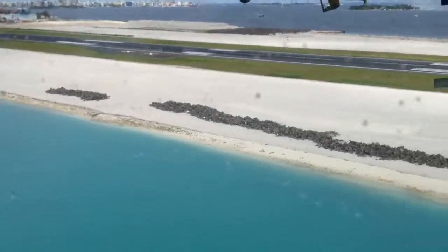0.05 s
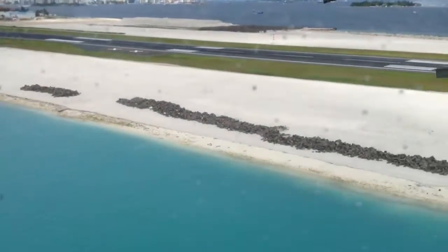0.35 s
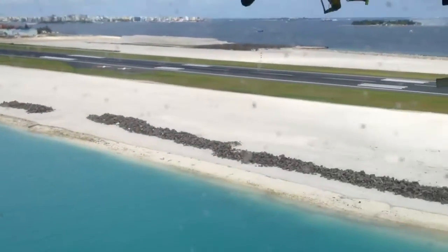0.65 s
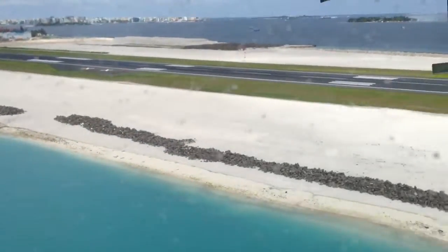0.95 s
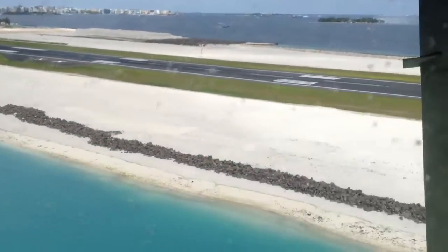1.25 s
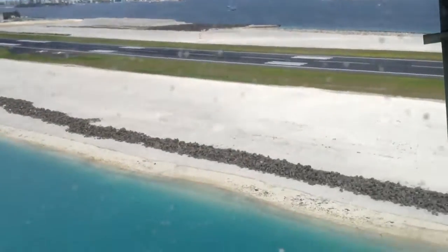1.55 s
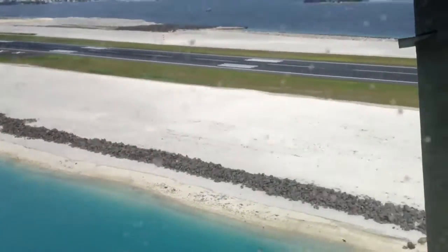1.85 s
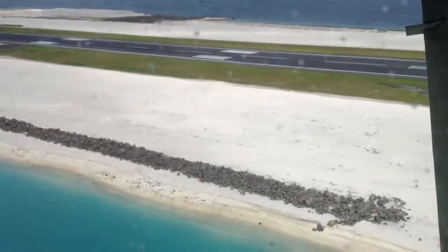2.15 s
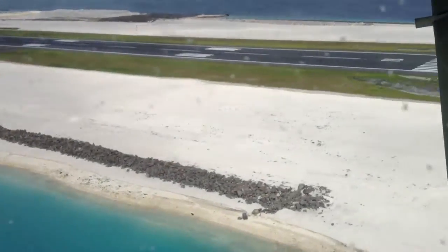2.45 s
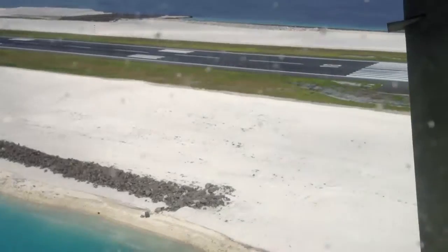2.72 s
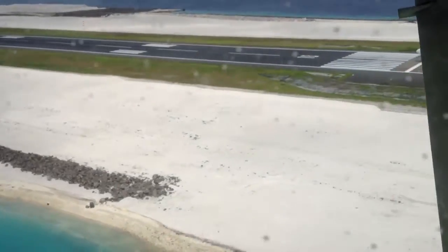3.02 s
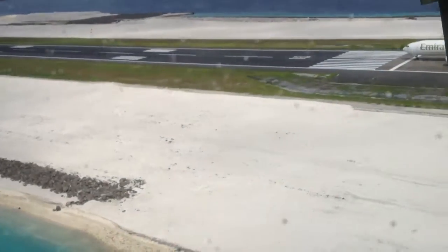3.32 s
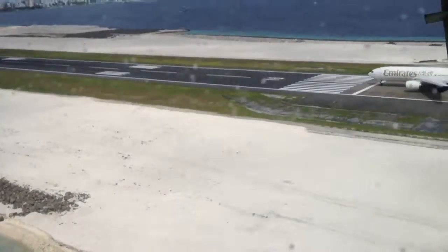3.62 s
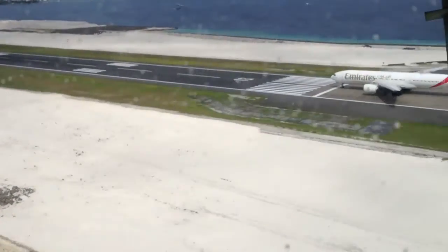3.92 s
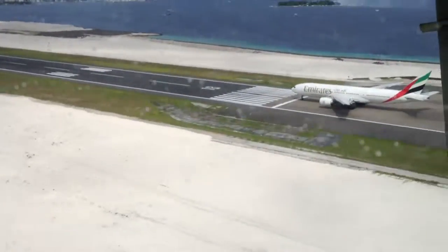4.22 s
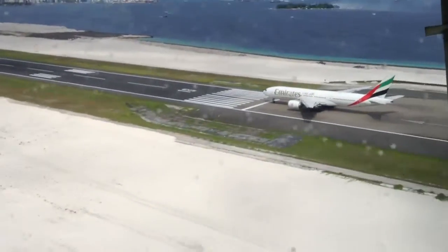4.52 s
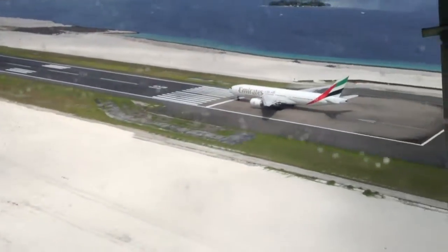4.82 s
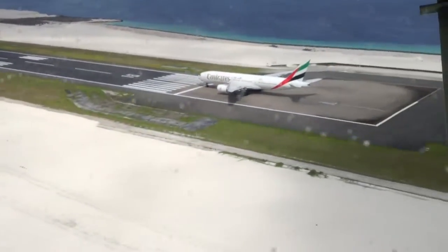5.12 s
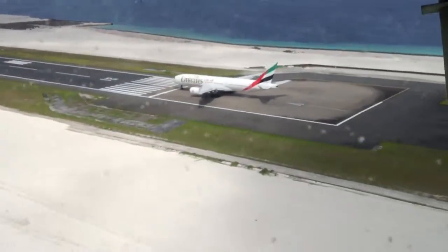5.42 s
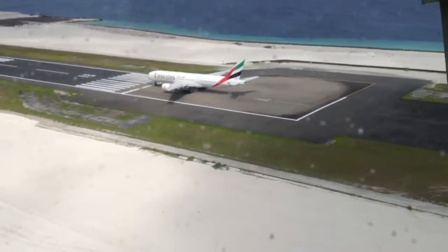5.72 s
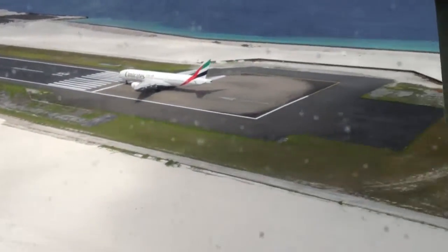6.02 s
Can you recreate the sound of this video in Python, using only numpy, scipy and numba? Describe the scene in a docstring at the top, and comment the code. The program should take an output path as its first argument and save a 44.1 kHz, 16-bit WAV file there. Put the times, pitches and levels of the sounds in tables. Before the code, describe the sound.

From the first moment, a loud, deep drone of two propeller engines fills the cabin of a small aircraft in flight, heard from a window seat. The propellers turn at slightly different speeds, so the drone throbs regularly, about two main pulses a second with weaker beats between them. The pitch stays nearly constant, with a rough, buzzing grain in the middle. Under the drone runs a steady low rumble of air with a soft hiss, and faint, thin gear whines waver slightly on top. The air eases very slightly from about 2.5 to 4.5 seconds and then picks up again, while the throb slackens just a little over time. The microphone sounds mildly overdriven, and the level ducks gently as the bass swells. The drone carries on at the same strength until the end, a little after 6 seconds.

```python
"""A deep, throbbing drone fills the cabin of a twin turboprop in flight, heard from a window seat.
Two three-blade propellers turn at slightly different speeds, so every harmonic beats.
Shaft tones, thin gear whine and rushing air lie under the drone.
The microphone strains, and its gain control and limiter duck on the throbs."""
import sys
import numpy as np
from scipy import signal
from scipy.fft import rfft, irfft
from scipy.io import wavfile
from scipy.ndimage import uniform_filter1d, minimum_filter1d
from numba import njit

SR = 44100
rng = np.random.default_rng(int(sys.argv[2]) if len(sys.argv) > 2 else 0)


def output_pcm(signal):
    """Save a mono or channel-first signal as 16-bit PCM at the path in sys.argv[1].

    Samples are clipped to [-1, 1] before scaling.
    """
    pcm = np.clip(np.atleast_2d(signal).T, -1, 1) * 32767
    wavfile.write(sys.argv[1], SR, np.round(pcm).astype(np.int16))


N = 276066
TIME = np.arange(N) / SR
LEFT_BLADE_HZ, RIGHT_BLADE_HZ, BLADES = 105.1, 107.108, 3

# The drone's harmonics. Each row: multiple of the blade rate, left level in dB, right base level in dB,
# time in seconds at which the two sides first arrive in step.
BLADE_HARMONICS = [ (1, -16.2, -13.4, 0.048), (2, -15.5, -10.7, 0.121), (3, -28.6, -31.5, 0.14),
                   (4, -63, -27.5, 0.097), (5, -30, -35, 0.047), (6, -33.5, -37, 0.031),
                   (7, -47, -47, 0.058), (8, -53, -43, 0.049), (9, -50, -47.5, 0.044),
                   (10, -52.5, -48, 0.036), (11, -51, -53.5, 0.036)]
def propellers(left, right, base_rough=0.014, top_rough=0.35, flutter_hz=3.8, smear_cycles=0.22):
    """Two stacks of blade harmonics; harmonic k throbs at k times the gap between the blade rates."""
    # The microphone drifts through the right propeller's standing waves:
    # the third harmonic crosses a node and swells again, while the fifth fades.
    node_s, node_to_crest_s, fifth_db_per_s = 2.4, 4.9, -1.64
    standing_wave = {3: np.sin(np.pi / 2 * (TIME - node_s) / node_to_crest_s),
                     5: undb(fifth_db_per_s * (TIME - TIME.mean()))}
    drone = 0
    for k, left_db, right_db, in_step_s in BLADE_HARMONICS:
        rough = min(base_rough * k ** 2, top_rough)  # long waves fill the cabin evenly, short ones flutter
        smear = smear_cycles * k  # the wall smears each pulse: higher harmonics come later
        lag = (RIGHT_BLADE_HZ - LEFT_BLADE_HZ) * in_step_s  # each path across the cabin shifts its beat
        left_tone = fluttering_tone(k * (left - smear), rough, flutter_hz)
        right_tone = fluttering_tone(k * (right - smear - lag), rough, flutter_hz)
        drone += undb(left_db) * left_tone + undb(right_db) * standing_wave.get(k, 1) * right_tone
    return drone


def blade_passes(hunt_period_s=1.724, fastest_s=0.17, left_swing_hz=0.1, right_swing_hz=0.083):
    """Running count of blade passes, left and right; both speeds sway gently as the governors hunt."""
    sag_hz_per_s = 0.0112  # the right propeller loses speed, so the throb slackens a little
    hunt = np.cos(2 * np.pi * (TIME - fastest_s) / hunt_period_s)
    left_hz = LEFT_BLADE_HZ + left_swing_hz * hunt
    right_hz = RIGHT_BLADE_HZ + right_swing_hz * hunt - sag_hz_per_s * TIME
    return np.cumsum(left_hz) / SR, np.cumsum(right_hz) / SR


def fluttering_tone(cycles, rough, flutter_hz):
    """A tone whose strength and timing are shaken by turbulent air."""
    angle = 2 * np.pi * cycles
    return (1 + rough * wobble(flutter_hz)) * np.cos(angle) + rough * wobble(flutter_hz) * np.sin(angle)


# The grain in the drone. Each row: multiple of the shaft rate, left level in dB, right level in dB.
SHAFT_ORDERS = [(2, -56, -48), (4, -39, -38), (5, -31, -36), (7, -42, -40), (8, -43, -51), (10, -52, -48),
                (11, -44, -56), (13, -52, -49), (14, -56, -49), (16, -58, -54), (17, -54, -52),
                (23, -60, -56)]
def shafts(left, right, rough=0.36, flutter_hz=27.0):
    """Unequal blades repeat once a turn, filling the gaps between the blade harmonics with rough tones."""
    orders, left_db, right_db = np.transpose(SHAFT_ORDERS)
    grain = 0
    for passes, levels_db in ((left, left_db), (right, right_db)):
        turns = passes / BLADES
        tones = sum(undb(db) * np.cos(2 * np.pi * (order * turns + rng.random()))
                    for order, db in zip(orders, levels_db))
        grain += tones * (1 + rough * wobble(flutter_hz))
    return grain


# The whine on top. Each row: pitch in Hz, level in dB.
GEAR_WHINES = [(1817.5, -54.5), (1866, -59), (2978, -57), (3035, -63.5), (4757, -68), (4953, -87),
               (9691, -65), (9797, -66), (9834, -76), (11515, -72), (12043, -86)]
def gears(wander=0.00045, wander_hz=3.36):
    """Gear meshes and turbine blades sing thin tones that wander together with the turbine speed."""
    clock = np.cumsum(1 + wander * wobble(wander_hz)) / SR
    return sum(undb(db) * np.cos(2 * np.pi * (hz * clock + rng.random())) for hz, db in GEAR_WHINES)


# Slipstream and exhaust through the wall. Each row: frequency in Hz, relative noise density in dB.
RUMBLE_COLOUR = [(20, 12.5), (55, 3.5), (90, -4.5), (125, -3), (175, 6), (230, 3.5), (290, -1), (380, -8.5),
                 (500, -9), (700, -13.5), (1000, -18), (1300, -17), (1700, -32), (3000, -47)]
# Air past the window and from the vents. Each row: frequency in Hz, relative noise density in dB.
HISS_COLOUR = [(500, -28), (1500, 4), (2200, 1.5), (3300, -2), (4400, -3.5), (4800, -2), (5300, -11),
               (6300, -7), (9200, -13), (9800, -9.5), (10500, -18), (12300, -13.5), (14000, -22),
               (15300, -28)]
# The strength of the airflow, easing and picking up again. Each row: time in seconds, gain in dB.
AIR_STRENGTH = [(0, 1.1), (1.0, 0.85), (2.7, -0.04), (4.5, 0), (6.26, 0.9)]
def airflow(rumble_db=-19.5, hiss_db=-39):
    """Turbulent air on the fuselage: a bed of rumble and hiss that eases slightly and picks up again."""
    bed = noise(RUMBLE_COLOUR) * undb(rumble_db) + noise(HISS_COLOUR) * undb(hiss_db)
    strength_db = np.interp(TIME, *np.transpose(AIR_STRENGTH))
    return bed * undb(strength_db)


def noise(colour):
    """Noise of rms 1, shaped by a curve of (Hz, dB) points."""
    hz, db = np.transpose(colour)
    bin_hz = np.maximum(np.arange(N // 2 + 1) * SR / N, 1)
    shape = undb(np.interp(np.log(bin_hz), np.log(hz), db))
    shaped = irfft(rfft(rng.standard_normal(N)) * shape, N)
    return shaped / shaped.std()


def wobble(rate_hz, points=4096, span_s=8):
    """Smooth random motion of spread 1, rolling off above rate_hz."""
    hz = np.arange(points // 2 + 1) / span_s
    slow = irfft(rfft(rng.standard_normal(points)) / (1 + (hz / rate_hz) ** 2))
    return np.interp(TIME, np.arange(points) * span_s / points, slow / slow.std())


def undb(db):
    """Decibels to gain."""
    return 10 ** (np.asarray(db) / 20)


def gain_control(x, duck_db=1.3, bass_hz=140, window_s=0.04):
    """Turns the gain down as the bass swells, so the throb lopes in strong and weak beats."""
    bass = signal.sosfilt(signal.butter(6, bass_hz, fs=SR, output="sos"), x)
    power = uniform_filter1d(bass ** 2, int(window_s * SR))
    swell = power / power.mean() - 1
    return x * undb(-duck_db * swell)


def microphone(x, bend=0.18, low_cut_hz=179.4):
    """The overdriven input bends the wave one way: tones mix and the hiss buzzes at the blade rate."""
    bent = x + bend * (x ** 2 - np.mean(x ** 2))
    return signal.sosfilt(signal.butter(2, low_cut_hz, "highpass", fs=SR, output="sos"), bent)


@njit
def follow_peaks(size, fall):
    """An envelope that jumps to each peak and sinks back slowly."""
    envelope, held = np.empty(len(size)), 0.
    for i in range(len(size)):
        held = max(size[i], held * fall)
        envelope[i] = held
    return envelope


def limiter(x, drive_db=1.5, ceiling=0.7, release_s=0.17, ahead_s=0.005):
    """Looks a moment ahead and ducks just enough to keep peaks under the ceiling."""
    driven = x * undb(drive_db)
    peaks = follow_peaks(np.abs(driven), np.exp(-1 / (release_s * SR)))
    gain = np.minimum(1, ceiling / (peaks + 1e-9))
    span = int(ahead_s * SR)
    return driven * uniform_filter1d(minimum_filter1d(gain, span), span)


def scene():
    """The mono mix at the seat: drone, shaft tones and whine over the bed of air."""
    left, right = blade_passes()
    tones = propellers(left, right) + shafts(left, right) + gears()
    return (np.sqrt(2) * tones + airflow())[None]  # sqrt(2) makes the tone levels rms


def record(dry):
    """The gain rides the bass, the microphone strains, a limiter holds the peaks and the top is cut."""
    limited = limiter(microphone(gain_control(dry[0])))
    high_cut = signal.ellip(10, 0.1, 80, 15250, fs=SR, output="sos")  # steep above 15250 Hz
    return signal.sosfilt(high_cut, limited)[None]


dry = scene()
out = record(dry)
output_pcm(out)
```